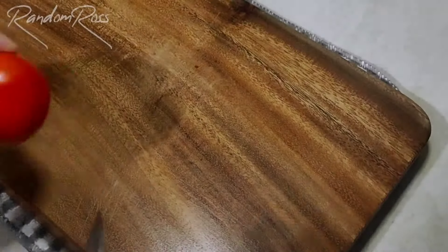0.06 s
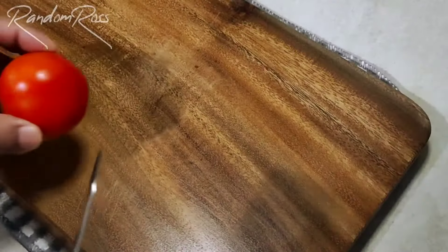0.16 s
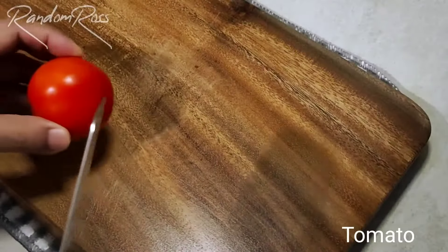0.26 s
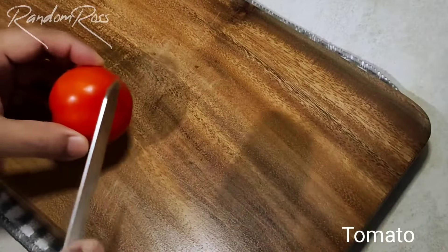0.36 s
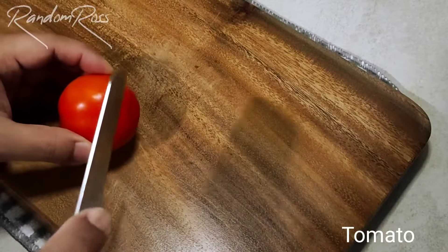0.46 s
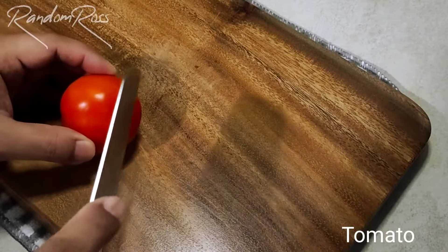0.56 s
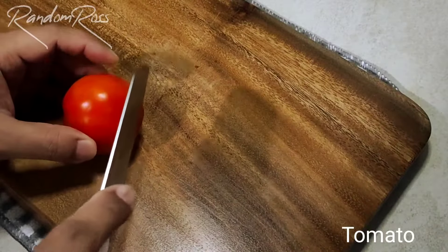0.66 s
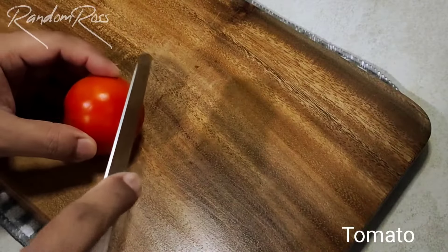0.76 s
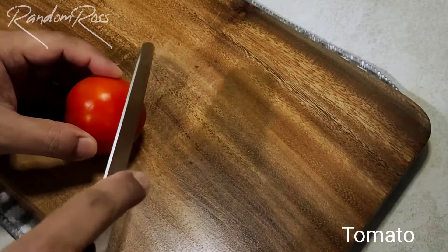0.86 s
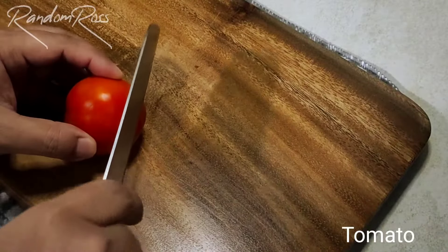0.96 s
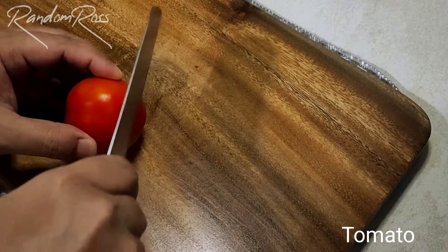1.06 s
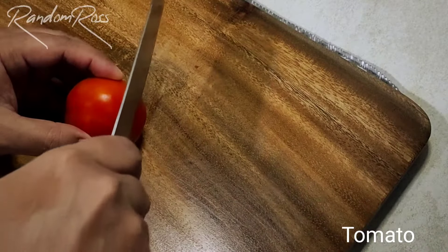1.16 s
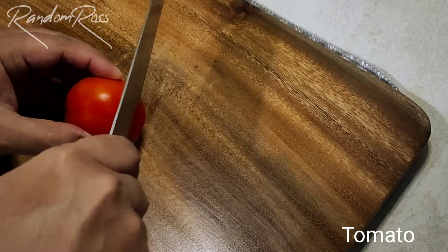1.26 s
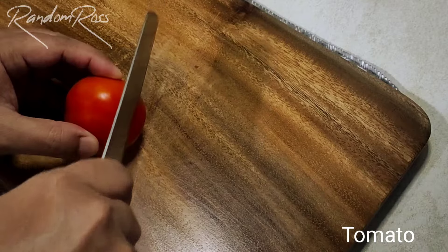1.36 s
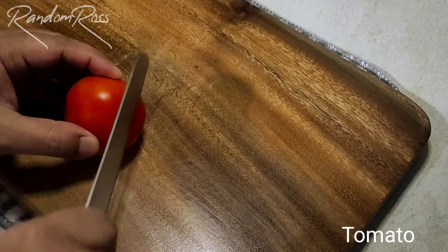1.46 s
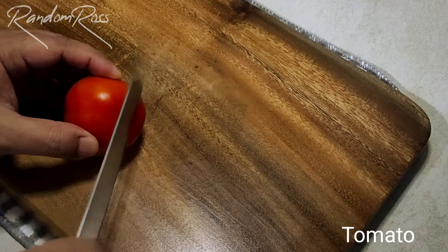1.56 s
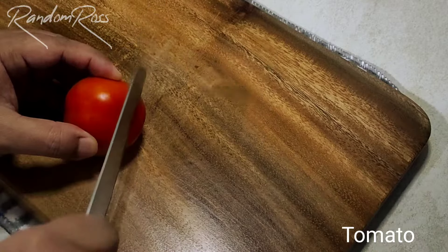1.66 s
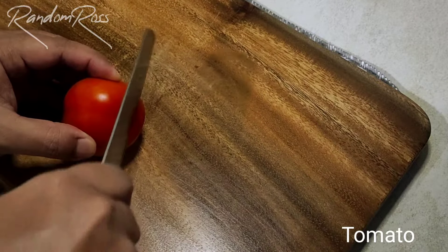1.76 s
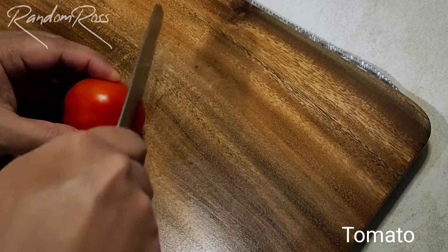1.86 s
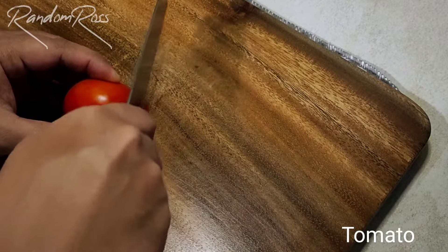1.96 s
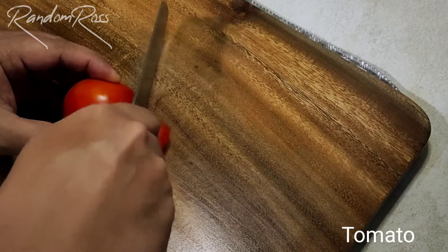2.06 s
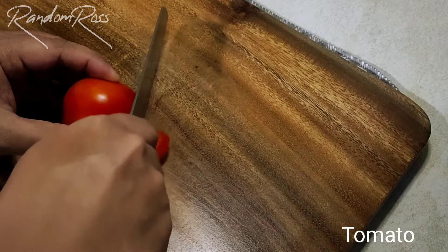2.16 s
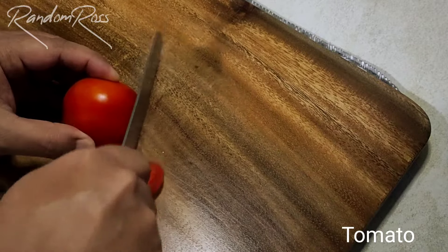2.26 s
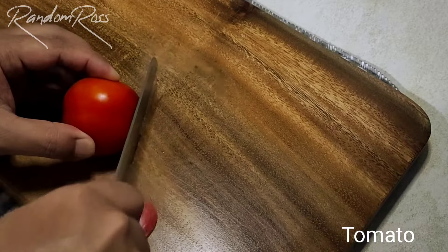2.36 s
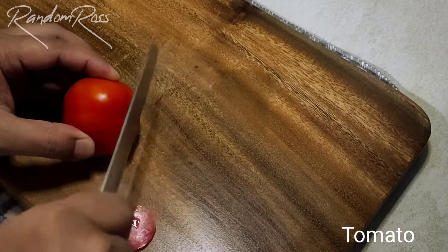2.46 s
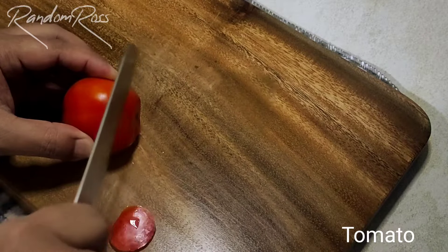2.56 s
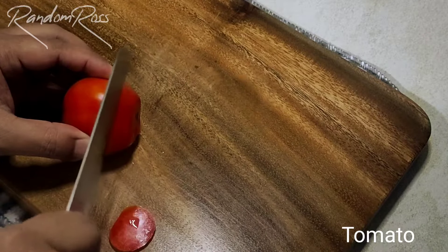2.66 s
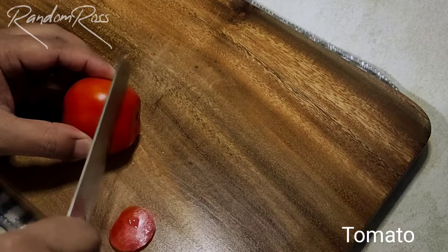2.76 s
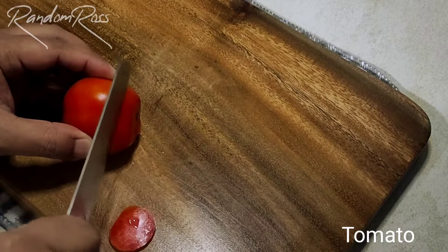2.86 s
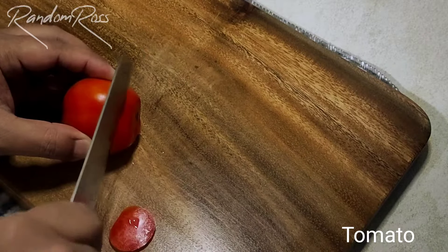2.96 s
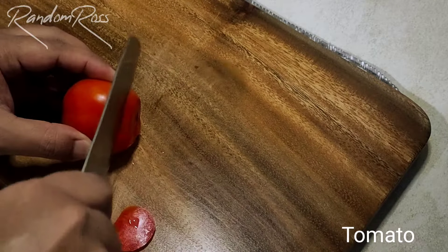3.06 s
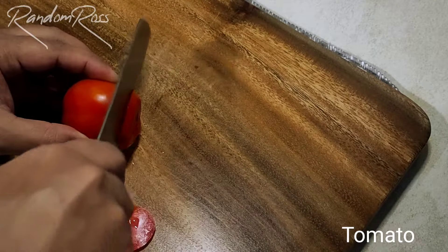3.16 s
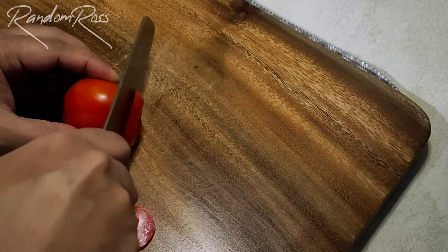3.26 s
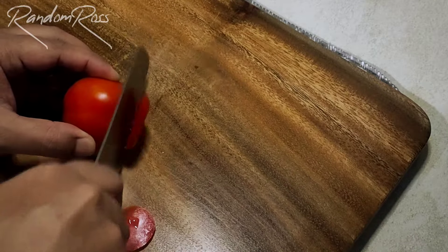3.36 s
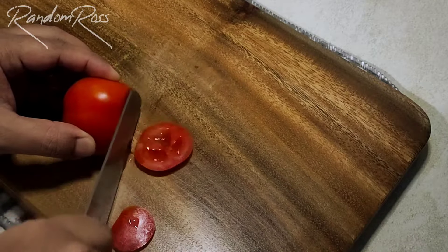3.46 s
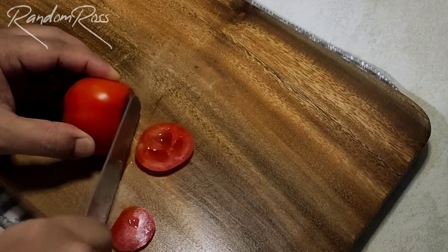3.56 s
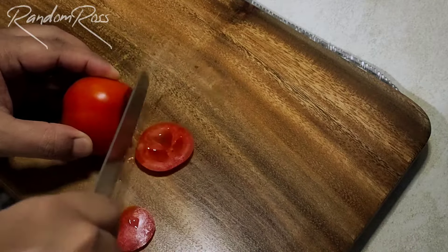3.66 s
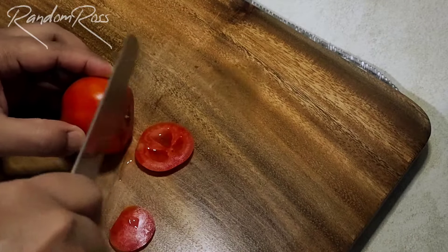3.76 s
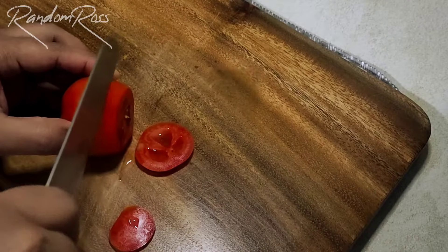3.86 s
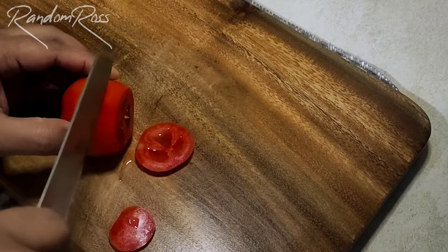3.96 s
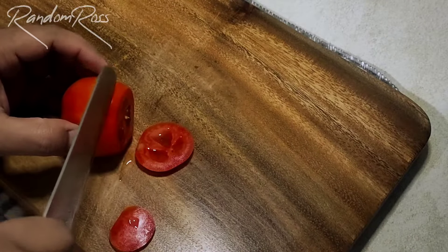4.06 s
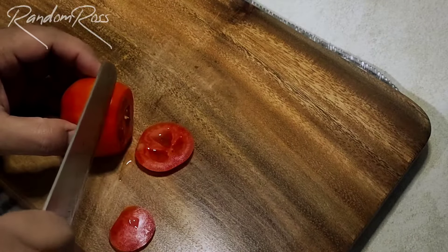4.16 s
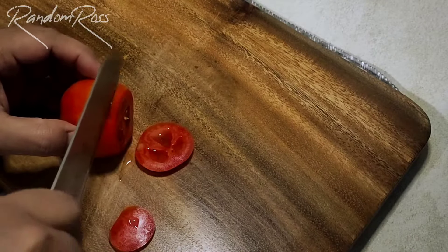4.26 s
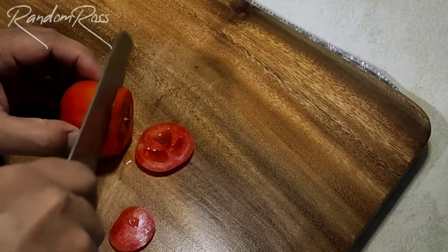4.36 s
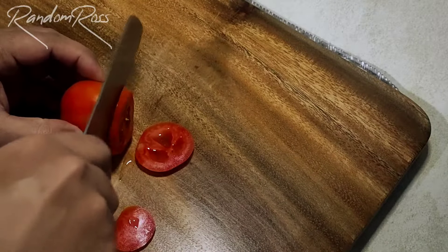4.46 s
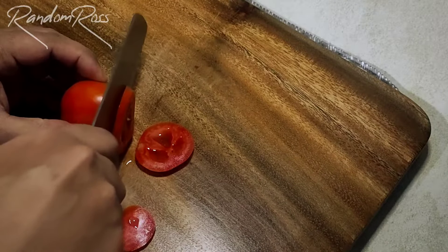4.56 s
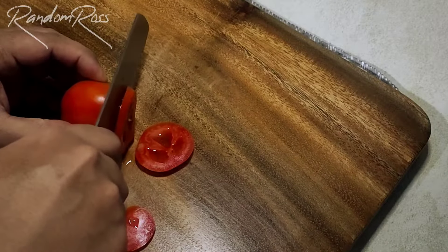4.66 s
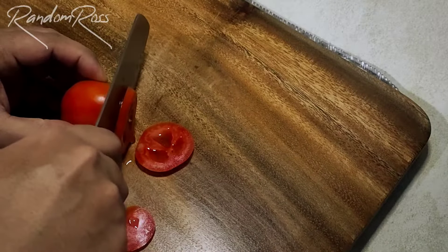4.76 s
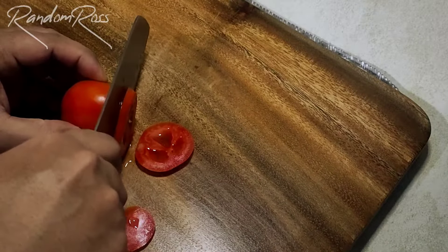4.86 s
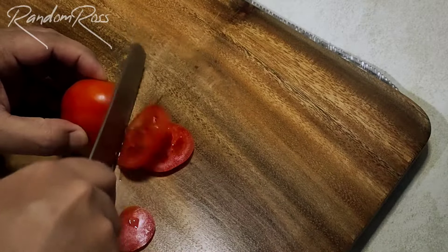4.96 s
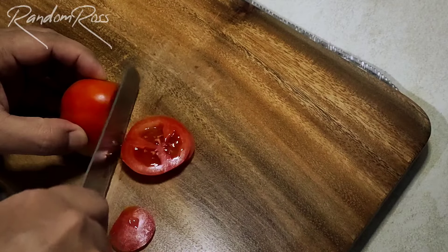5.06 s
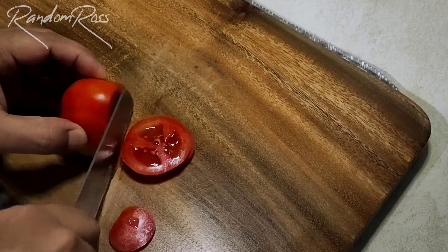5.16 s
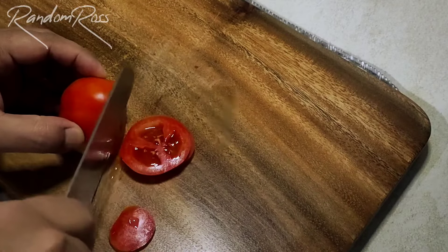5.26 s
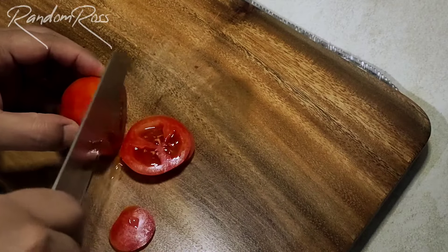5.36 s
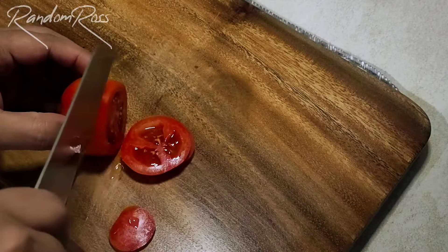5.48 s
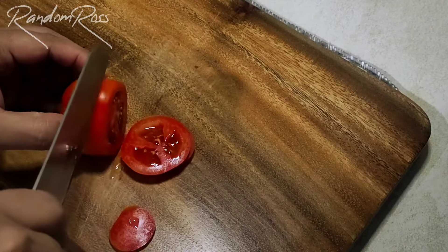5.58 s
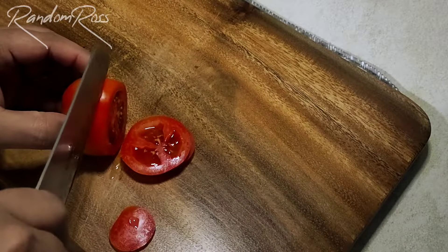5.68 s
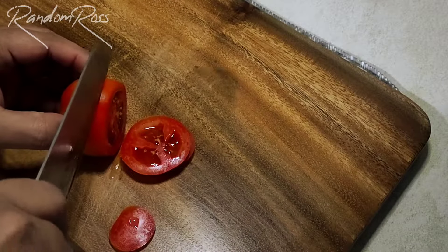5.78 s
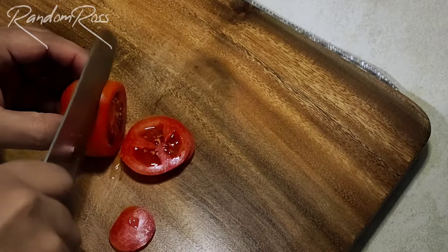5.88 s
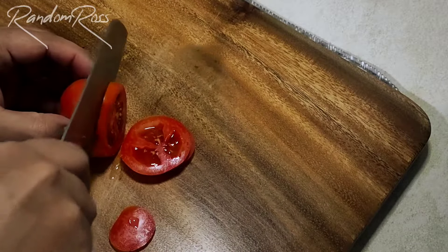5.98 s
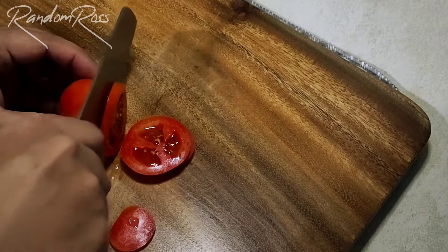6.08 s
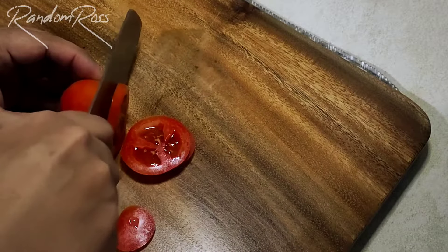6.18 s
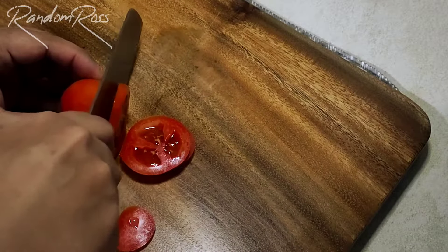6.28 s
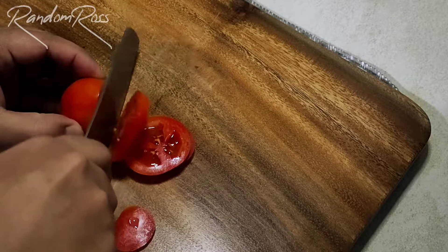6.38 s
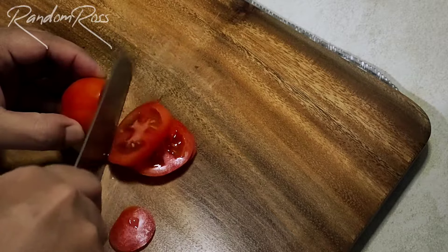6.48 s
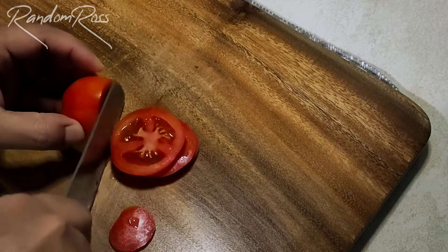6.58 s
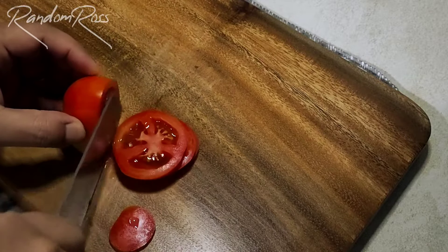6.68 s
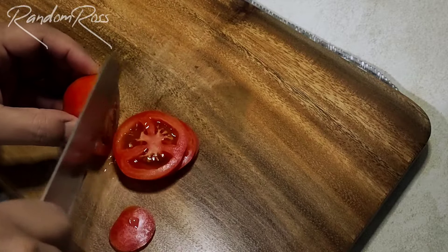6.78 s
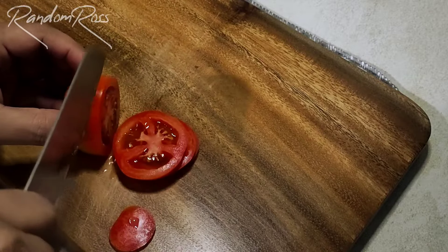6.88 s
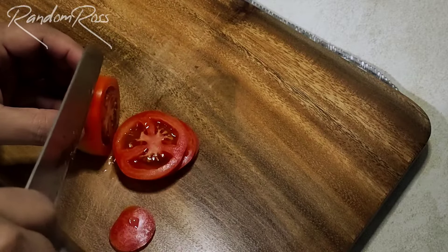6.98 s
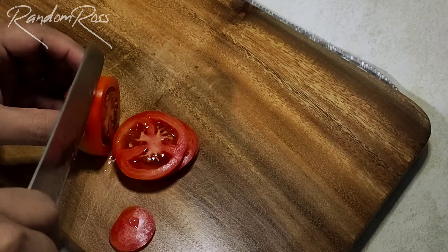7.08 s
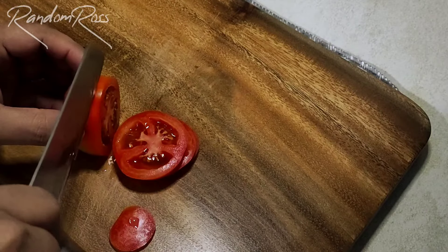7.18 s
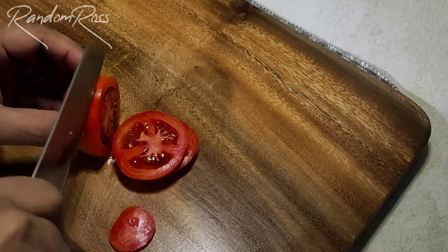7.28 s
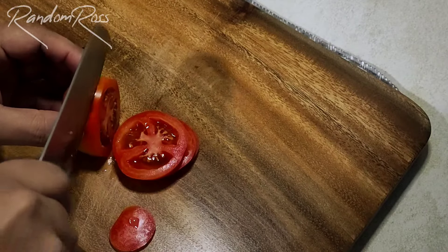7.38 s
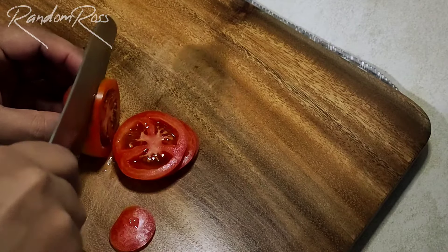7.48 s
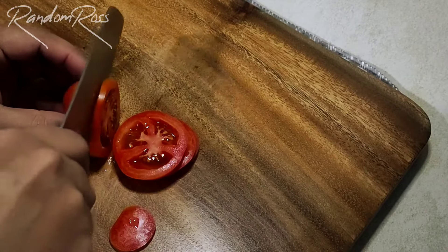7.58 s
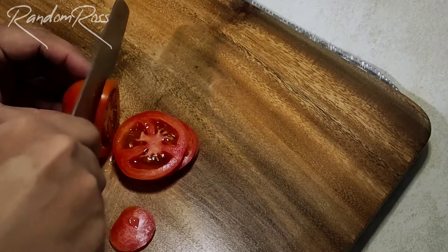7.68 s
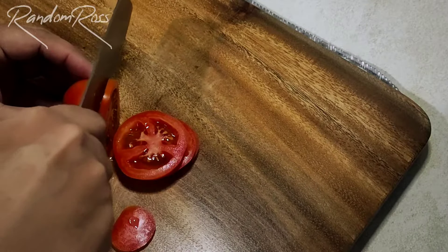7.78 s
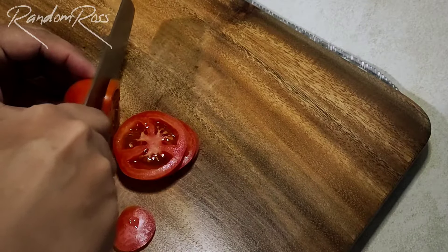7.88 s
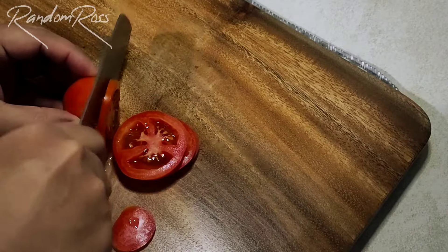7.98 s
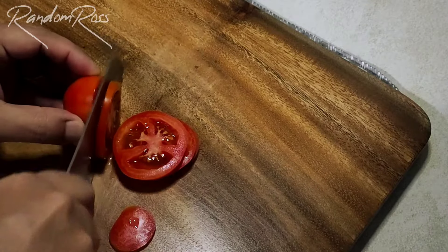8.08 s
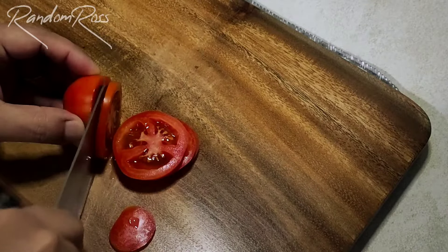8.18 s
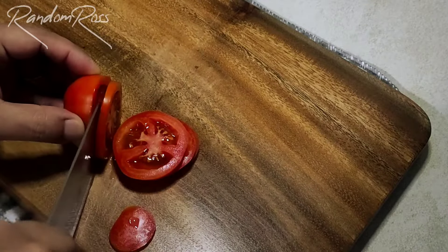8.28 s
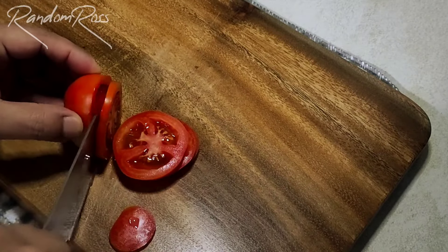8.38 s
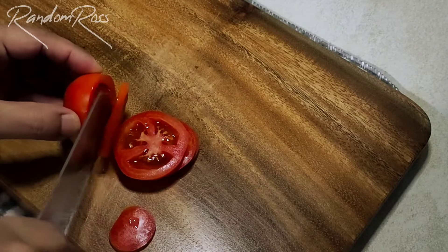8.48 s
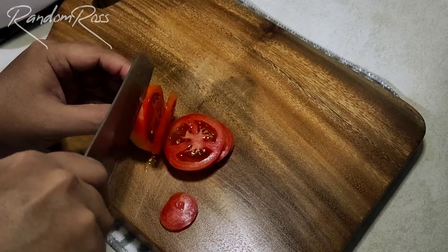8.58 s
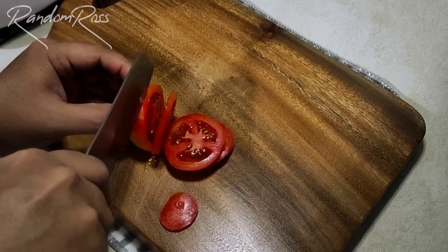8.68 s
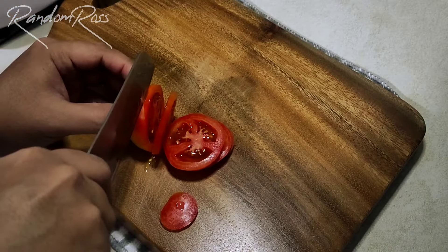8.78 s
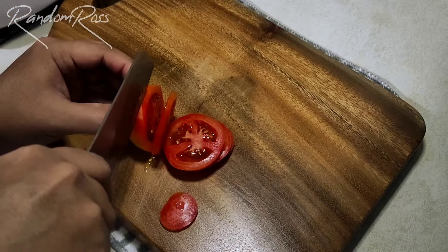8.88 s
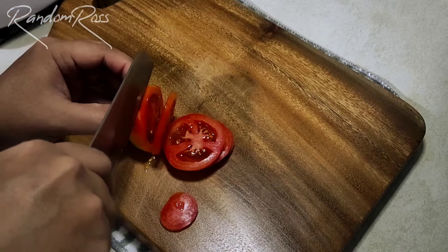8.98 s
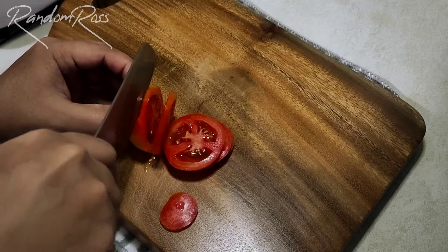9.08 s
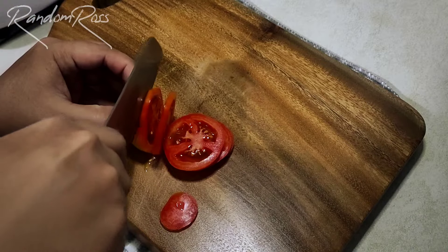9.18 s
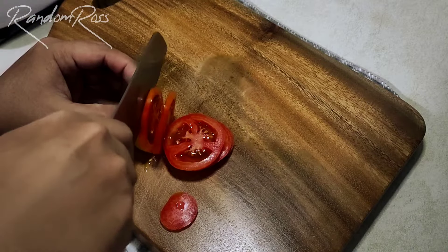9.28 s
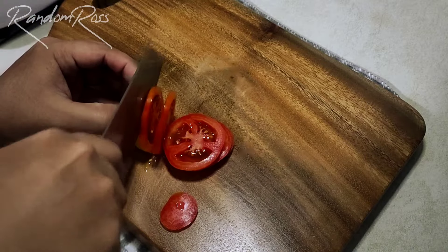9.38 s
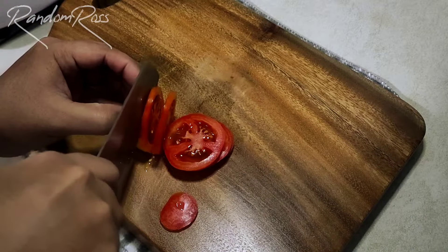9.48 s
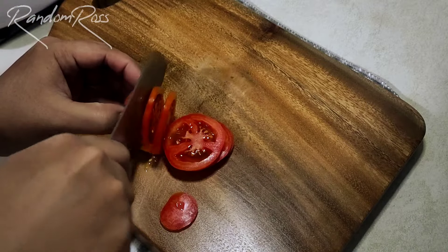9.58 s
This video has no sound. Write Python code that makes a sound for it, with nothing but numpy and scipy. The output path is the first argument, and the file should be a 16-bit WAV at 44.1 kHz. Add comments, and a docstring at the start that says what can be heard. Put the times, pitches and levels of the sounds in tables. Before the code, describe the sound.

A knife saws softly through a ripe tomato in a quiet kitchen, with uneven sharp knocks and short scrapes as the blade meets a wooden board.

```python
"""A kitchen knife slices a tomato on a wooden board, close to a stereo microphone in a quiet kitchen.
The blade hisses through skin and flesh and drags along the board: shaped noise with levels set stroke by stroke.
Knocks of the blade and dull thuds of falling slices ring the board's modes, with a noise crack on top
and a faint echo from the kitchen.
Below lie the room's rumble and hiss (noise), thin steady tones (wandering sines) and a few faint pips."""
import sys
import numpy as np
from scipy import signal
from scipy.fft import rfft, irfft, next_fast_len
from scipy.io import wavfile
from scipy.ndimage import uniform_filter1d

SR = 44100
rng = np.random.default_rng(int(sys.argv[2]) if len(sys.argv) > 2 else 0)


def magnitude_from_level(level_db):
    """Linear magnitude for a level in decibels (20 dB per decade)."""
    exponent = np.asarray(level_db, float) / 20
    return 10 ** exponent


def log_audio(samples):
    """Write samples as a 16-bit WAV file to the path given in sys.argv[1]."""
    # one column per channel
    frames = np.atleast_2d(samples).T
    # limit to full scale, then quantise
    limited = np.clip(frames, -1, 1)
    pcm = np.round(limited * 32767).astype(np.int16)
    wavfile.write(sys.argv[1], SR, pcm)


N = 424683

# Impacts on the board: knocks of the blade and thuds of falling slices. Each row: time in seconds,
# level in dB, then against that level in dB the modes under 450 Hz, near 1500 Hz and near 4200 Hz.
IMPACTS = [(2.1354, -43, -22, -4, -5), (2.1691, -10, -45, -16, -33), (2.6598, -42.5, 20.5, -1, -6.5),
           (2.672, -42, 8, -12, -26), (2.7205, -56, 8, 1.5, -5), (3.5095, -16.5, -21, -7, -27),
           (5.0496, -23, -10.5, -11.5, -24), (5.101, -54, -7, 4, -18), (6.4352, -23, -17, -39, -48),
           (8.186, -47.5, 10, -29, -19)]


def rms_one(x):
    """Scale to unit rms."""
    return x / np.sqrt(np.mean(x ** 2) + 1e-20)


def at_hz(points, hz):
    """Read a (Hz, value) table on a log frequency axis."""
    table_hz, value = np.transpose(points)
    return np.interp(np.log(hz), np.log(table_hz), value)


def drift(rate_hz):
    """Slow random curve of rms 1: white noise through two equal low-pass poles."""
    step = 40  # samples per point of the slow curve
    pole = np.exp(-2 * np.pi * rate_hz * step / SR)
    white = rng.standard_normal(N // step + 2002)
    slow = signal.lfilter([1], [1, -2 * pole, pole * pole], white)[2000:]
    return np.interp(np.arange(N) / step, np.arange(len(slow)), rms_one(slow))


def decay_per_sample(t60_s):
    """Gain per sample of a 60 dB decay in t60_s."""
    return magnitude_from_level(-60 / (t60_s * SR))


def sides(x, left_right_db):
    """Share a sound between left and right."""
    return x * magnitude_from_level(np.multiply.outer([.5, -.5], left_right_db))


def coloured(spectrum):
    """Stereo noise of rms 1: a shared and an opposed part set the likeness, port gains the balance."""
    # Left-right likeness of the noises. Each row: frequency in Hz, correlation.
    likeness = [(60, .96), (130, 0.93), (290, 0.71), (640, .3), (1410, -0.033), (3100, -0.14), (5200, 0.13),
                (6200, .6), (7240, 0.24), (8270, 0.41), (9300, 1), (10300, 0.61), (11400, .3),
                (12400, 0.59), (13400, 0.66), (15500, 1)]
    # Treble difference of the two microphone ports. Each row: frequency in Hz, left-right in dB.
    ports = [(60, 1.5), (300, -1), (3000, 0), (5200, -0.5), (6200, -3), (7240, -1), (8270, -7),
             (9300, -9.5), (10300, 8), (11400, 8), (12400, 8), (13400, 1), (14500, 0.5), (15500, 0)]
    size = next_fast_len(N)
    hz = np.maximum(np.fft.rfftfreq(size, 1 / SR), 1)
    alike = np.clip(at_hz(likeness, hz), -1, 1)
    mid, side = rfft(rng.standard_normal((2, size))) * magnitude_from_level(at_hz(spectrum, hz))
    pair = np.sqrt(1 + alike) * mid + np.sqrt(1 - alike) * side * [[1], [-1]]
    return rms_one(irfft(sides(pair, at_hz(ports, hz)), size)[:, :N])


def patchy_treble(x, depth_db):
    """Patchy treble: random gains in brief, narrow cells; local mean power stays."""
    hz, _, cells = signal.stft(x, SR, nperseg=2048)
    patches = uniform_filter1d(rng.standard_normal(cells.shape[1:]), size=5, axis=0)
    patches = rms_one(uniform_filter1d(patches, size=2, axis=1))
    treble = np.clip(hz / 6000, 0, 1)[:, None]
    gain = magnitude_from_level(depth_db * np.minimum(patches, 1.2) * treble)
    mean_power = uniform_filter1d(uniform_filter1d(gain ** 2, size=61, axis=0), size=5, axis=1)
    return signal.istft(cells * gain / np.sqrt(mean_power), SR, nperseg=2048)[1][:, :N]


def room():
    """Rumble and hiss: coloured noise whose bass swells slowly."""
    # Room noise spectrum. Each row: frequency in Hz, relative density in dB per Hz.
    spectrum = [(15, -66), (25, -76), (43, -11.5), (123, 0), (199, -8.5), (228, -10.5), (254, -10.5),
                (291, -6), (380, -11), (526, -9), (618, -17), (901, -17), (1120, -20.5), (1250, -21),
                (1350, -19), (1970, -25.5), (4670, -32.5), (9160, -32.5), (15700, -39.5)]
    # Rumble. Each row: time in seconds, bass level in dB.
    rumble = [(0.0, -62), (1.48, -62.5), (1.69, -60), (2.6, -62.5), (2.82, -58), (3.08, -61), (3.41, -57.5),
              (4.1, -61.5), (6.06, -62), (6.89, -60.5), (7.83, -61.5), (8.26, -56), (8.45, -62),
              (9.01, -57), (9.63, -56.5)]
    air = magnitude_from_level(-58) * coloured(spectrum)
    bass = signal.sosfiltfilt(signal.butter(1, 300, fs=SR, output="sos"), air)
    s, rumble_db = np.transpose(rumble)
    bass_db = np.interp(np.arange(N) / SR, s, rumble_db) + 1.24 * drift(7.8)
    return air - bass + rms_one(bass) * magnitude_from_level(bass_db)


def tones():
    """Narrow steady lines whose phase wanders, arriving with their own phase at each ear."""
    # Steady lines. Each row: frequency in Hz, level in dB rms, rms frequency wander in Hz.
    lines = [(117, -70, 10), (274, -79, 7.5), (1228, -78.5, 4.4), (1283, -73, 1.2)]
    out = np.zeros((2, N))
    for hz, level_db, width_hz in lines:
        phase = 2 * np.pi * np.cumsum(hz + width_hz * drift(11)) / SR
        ear_phase = np.array([[0], [hz / 900]])
        out += np.sqrt(2) * magnitude_from_level(level_db + 0.5 * drift(6.1)) * np.sin(phase + ear_phase)
    return out


def strokes(rows, rise_db_per_s, fall_db_per_s):
    """Level in dB of the loudest stroke: each rises, slides from first level to last, and falls."""
    t, out_db = np.arange(N) / SR, np.full(N, -120.)
    for start, length, first_db, last_db in rows:
        end = start + max(length, 1e-3)
        slide_db = np.interp(t, [start, end], [first_db, last_db])
        rise_db = rise_db_per_s * np.maximum(start - t, 0)
        fall_db = fall_db_per_s * np.maximum(t - end, 0)
        out_db = np.maximum(out_db, slide_db - rise_db - fall_db)
    return out_db


def blade_levels():
    """Hiss and rub in dB: both follow the cuts and drags, the rub also the board's jolts."""
    # The blade saws through skin and flesh. Each row: start in seconds, length in seconds,
    # hiss at start in dB, hiss at end in dB.
    slices = [(1.4, .16, -72, -65), (1.68, .41, -73, -60), (3.04, .27, -64, -59.5), (3.39, .1, -68, -57),
              (4.31, .17, -67, -59.5), (4.5, .15, -60.5, -62), (4.7, .2, -64, -73), (4.94, .09, -70, -57),
              (5.78, .23, -74, -60), (6.02, .17, -60.5, -62), (6.21, .035, -59, -55),
              (7.39, .21, -68, -63.5), (7.62, .2, -64.5, -66), (7.83, .12, -65, -61), (8.0, .17, -72, -59),
              (8.35, .14, -63, -72), (8.955, .02, -60, -61), (9.05, .15, -71, -65), (9.39, .07, -71, -66)]
    # The edge drags on the board. Each row: start in seconds, length in seconds,
    # hiss at start in dB, hiss at end in dB, rub against the hiss in dB.
    drags = [(2.136, .012, -50, -54, -30), (2.24, .12, -63, -49.5, -10), (2.36, .06, -49.5, -52, -11),
             (2.66, .03, -52, -58, 3), (2.721, .055, -54, -65, 1.5), (3.51, .09, -51, -59, -1.5),
             (3.665, .04, -61, -67, -9), (5.048, .09, -47, -57, -6), (5.15, .11, -57.5, -54.5, -3),
             (6.41, .23, -59.5, -57, -2.5), (6.65, .085, -55.5, -60.5, -4.5), (8.18, .16, -59, -60.5, 0.5),
             (9.2, .15, -64.5, -63.5, -2.5), (9.46, .06, -66, -64, 2.5), (9.55, .09, -66, -59, 1.5)]
    # The board shifts on its cloth under an impact. Each row: time in seconds, rub level in dB.
    jolts = [(2.175, -62), (2.675, -45.5), (3.511, -33.5), (5.1, -52), (6.48, -54)]
    idle_hiss_db, idle_rub_db = -78, -75  # hands and blade are never quite still
    slice_rub_db = -9  # rub felt in the board, against the hiss
    bite_db_per_s, lift_db_per_s = 2500, 600  # the edge bites into the board and leaves it

    cut_db = strokes(slices, rise_db_per_s=600, fall_db_per_s=200)
    drag_db = strokes([row[:4] for row in drags], bite_db_per_s, lift_db_per_s)
    drag_rubs = [(s, length, a + rub_db, b + rub_db) for s, length, a, b, rub_db in drags]
    drag_rub_db = strokes(drag_rubs, bite_db_per_s, lift_db_per_s)
    jolt_db = strokes([(s, 0, db, db) for s, db in jolts], bite_db_per_s, fall_db_per_s=650)
    hiss_db = np.maximum(np.maximum(cut_db, drag_db), idle_hiss_db)
    rub_db = np.max([cut_db + slice_rub_db, drag_rub_db, jolt_db], axis=0)
    return hiss_db, np.maximum(rub_db, idle_rub_db)


def friction(spectrum, level_db, grain_db):
    """Dense tiny slips of the edge: noise with a grainy level."""
    return coloured(spectrum) * magnitude_from_level(level_db + grain_db * (drift(19.6) + drift(200.6)))


def blade():
    """Bright hiss of the edge plus the duller rub felt in the board."""
    # Hiss spectrum. Each row: frequency in Hz, relative density in dB per Hz.
    hiss = [(2350, -44), (4000, 0.5), (4560, -4.5), (4910, -3), (5540, -14.5), (6290, 1), (7420, -5),
            (8370, 3), (10000, 0.5), (11900, 1.5), (12900, -0.5), (14200, -4), (15700, -4.5)]
    # Rub spectrum. Each row: frequency in Hz, relative density in dB per Hz.
    rub = [(290, -28), (500, -7), (600, 2.5), (705, -11.5), (1260, -10), (2060, -13), (2500, -12),
           (2970, -14), (4560, -14.5), (5530, -21), (6500, -22), (8450, -40), (14300, -120)]
    hiss_db, rub_db = blade_levels()
    return friction(hiss, hiss_db, grain_db=0.6) + friction(rub, rub_db, grain_db=0.0)


def impact_samples():
    """Sample index of each impact."""
    return np.round(np.array(IMPACTS)[:, 0] * SR).astype(int)


def ring(force, hz, t60_s):
    """A two-pole resonator: a unit click sets a decaying sine of height 1 ringing."""
    r, w = decay_per_sample(t60_s), 2 * np.pi * hz / SR
    return signal.lfilter([0, np.sin(w)], [1, -2 * r * np.cos(w), r * r], force + 1e-18)


def impact_colour_db(hz):
    """How hard each impact drives a mode at hz, against the impact's level: read between eight anchors."""
    # Anchor frequencies of an impact's colour, in Hz.
    anchors_hz = [240, 310, 450, 570, 880, 1500, 2600, 4200]
    colour_db = []
    for low, mid, top in np.array(IMPACTS)[:, 2:]:
        deepest = min(-2.5 + .65 * low, -1.5)  # varies less between impacts than the low modes
        near_880 = -5.5 + .27 * mid + .15 * low
        near_2600 = -13 + .55 * top
        anchors_db = [deepest, low, low, 0, near_880, mid, near_2600, top]
        colour_db.append(np.interp(np.log(hz), np.log(anchors_hz), anchors_db))
    return np.array(colour_db)


def board_modes():
    """Each impact and the chatter after it ring the board's modes; where and how it lands sets its colour."""
    KNOCK_HZ = 607  # the strongest mode under 1 kHz, used in the table
    # Board modes. Each row: frequency in Hz, level in dB, t60 in seconds, left-right in dB.
    modes = [(192, -17.5, 0.19, 1), (235, -1.5, .1, -1), (314, -8, 0.18, -5.5), (480, -6.5, .15, 3),
             (KNOCK_HZ, 3.5, .115, -5), (700, -10, .09, -5), (827, 1, 0.11, 4), (918, -11, 0.26, 3),
             (1040, -5, 0.097, 1), (1316, 2.5, 0.082, 5), (1325, 0.5, .08, 5), (1480, 2.5, 0.035, 3),
             (1692, -6, 0.11, 5), (2060, -5, 0.039, -1), (2440, 2, 0.046, -3), (2562, 4.5, 0.055, 18.5),
             (2730, -3, .04, 21), (3070, 1.5, 0.033, 15), (3640, 7, 0.019, -9), (3840, 0, 0.038, -8),
             (4500, -26, 0.043, -9), (5350, -1.5, 0.021, 0), (5100, -28, 0.064, 2)]
    rebound_s, rebound_db = 0.014, -15  # the board rings freely, then settles on its cloth, muffled
    rows, at = np.array(IMPACTS), impact_samples()
    free, pressed = np.zeros((2, N)), np.zeros((2, N))
    chance, jitter = rng.standard_normal((len(rows), len(modes))), rng.standard_normal(N)
    chatter_db = np.where(rows[:, 2] > 0, -27, -34.5)  # after a dull, low impact; after a crisp one
    for k, (hz, level_db, t60_s, pan_db) in enumerate(modes):
        force, chatter = np.zeros((2, N))
        force[at] = magnitude_from_level(rows[:, 1] + level_db + impact_colour_db(hz) + 0.95 * chance[:, k])
        chatter[at] = force[at] * magnitude_from_level(chatter_db)
        chatter = jitter * signal.lfilter([1], [1, -decay_per_sample(.17)], chatter + 1e-18)
        contact = np.exp(-2 * np.pi * hz / SR)  # the contact lasts: modes swell in, not click
        push = signal.lfilter([1 - contact], [1, -contact], force)
        free -= (-1) ** k * sides(ring(push, hz, t60_s)[None], [pan_db])
        # under the blade's weight the modes are damped
        pressed += sides(ring(chatter, hz, 0.24 * t60_s)[None], [pan_db])
    latest = np.maximum(np.searchsorted(at, np.arange(N), "right") - 1, 0)
    since_s = (np.arange(N) - at[latest]) / SR
    muffle_db = rebound_db * np.clip((since_s - rebound_s) / 0.0032, 0, 1)
    out = pressed + free * magnitude_from_level(muffle_db)
    # a small board radiates no deep bass
    return signal.sosfilt(signal.butter(4, 170, "high", fs=SR, output="sos"), out)


def crack():
    """A short burst of bright noise tops each impact."""
    rows, burst = np.array(IMPACTS), np.zeros(N)
    burst[impact_samples()] = magnitude_from_level(rows[:, 1] + rows[:, 4] + 0.5)
    burst = signal.lfilter([1], [1, -decay_per_sample(0.027)], burst) * rng.standard_normal(N)
    return signal.sosfilt(signal.butter(2, [3000, 15000], "band", fs=SR, output="sos"), burst)


def from_the_right(x):
    """The board lies nearer the right microphone: the left hears it a little later."""
    left_lag = 7  # samples
    return np.array([np.pad(x[0], (left_lag, 0))[:N], x[1]])


def kitchen(x):
    """Echo of the kitchen: eight feedback delays a side, duller on every round."""
    t60_s, wall_cut_hz = 0.36, 6100
    size, dull = next_fast_len(N + SR), np.exp(-2 * np.pi * wall_cut_hz / SR)
    turn = -2j * np.pi * np.fft.rfftfreq(size)
    wall = (1 - dull) / (1 - dull * np.exp(turn))
    echoes = np.zeros((2, len(turn)), complex)
    lags = (rng.uniform(.008, 0.027, 16) * SR).astype(int)
    for k, lag in enumerate(lags):
        loop = magnitude_from_level(-60 * lag / SR / t60_s) * wall * np.exp(turn * lag)
        echoes[k % 2] += loop / (1 - loop) * (-1) ** (k // 2)
    return irfft(echoes * rfft(x, size), size)[:, :N]


def pips():
    """Faint short sines, each under a half-sine envelope."""
    # Each row: start in seconds, length in seconds, frequency in Hz, peak level in dB.
    rows = [(9.228, .055, 1480, -63), (9.488, .03, 3600, -65), (9.528, .02, 3050, -65),
            (9.55, .035, 2000, -67)]
    t, out = np.arange(N) / SR, np.zeros(N)
    for start, length, hz, level_db in rows:
        shape = np.sin(np.pi * np.clip((t - start) / length, 0, 1))
        out += magnitude_from_level(level_db) * shape * np.sin(2 * np.pi * hz * t)
    return out


def scene():
    """Room and tones, blade and board close by, their echo (board only), pips."""
    backdrop = patchy_treble(room(), depth_db=8.5) + tones()
    cutting = patchy_treble(blade(), depth_db=12.0)
    board = board_modes() + crack()
    echo = magnitude_from_level(-28) * kitchen(board.mean(axis=0))
    return backdrop + cutting + from_the_right(board) + echo + pips()


def roll_off(x):
    """The treble ends steeply here."""
    return signal.sosfilt(signal.butter(12, 16490, fs=SR, output="sos"), x)


def record(dry):
    """The microphone drops the lowest bass and the very top."""
    x = signal.sosfilt(signal.butter(2, 30, "high", fs=SR, output="sos"), dry)
    mix = signal.sosfilt(signal.cheby2(12, 50, 15950, fs=SR, output="sos"), x)
    return roll_off(mix)


dry = scene()
out = record(dry)
log_audio(out)
```